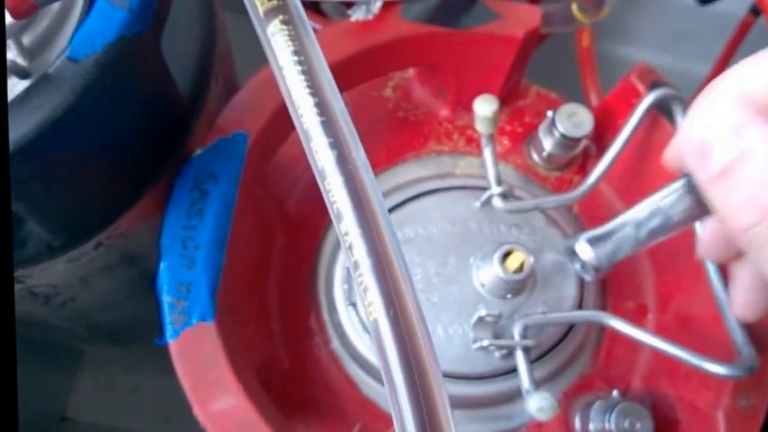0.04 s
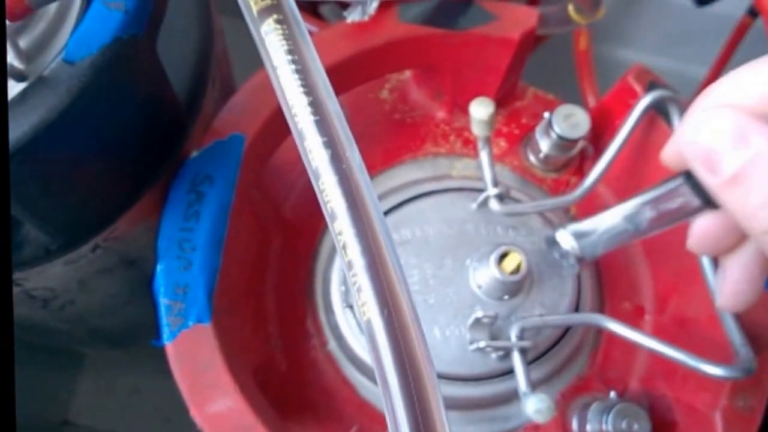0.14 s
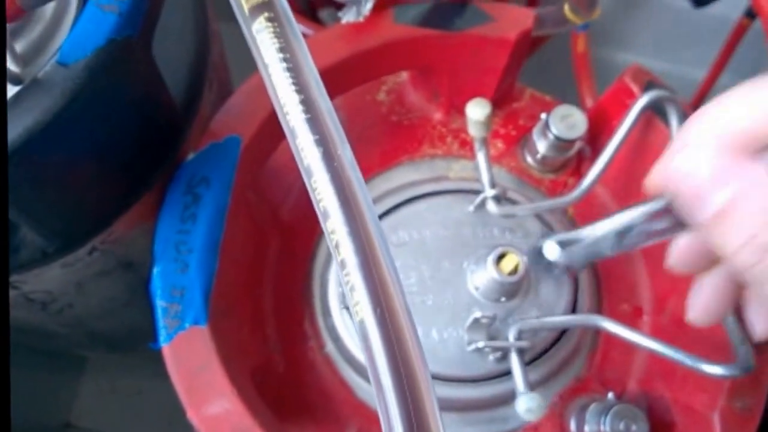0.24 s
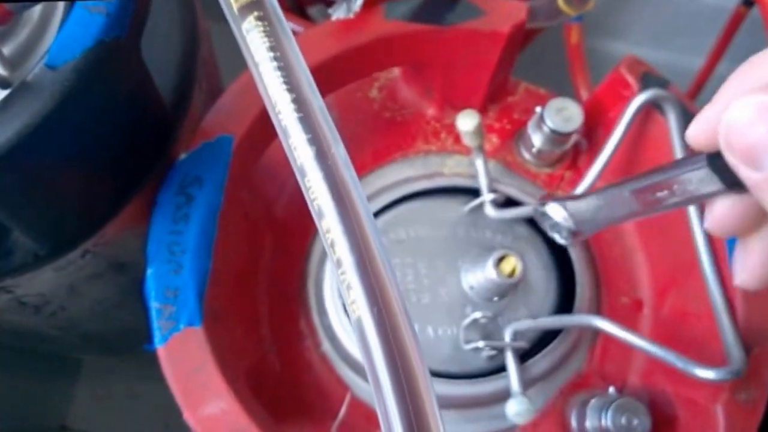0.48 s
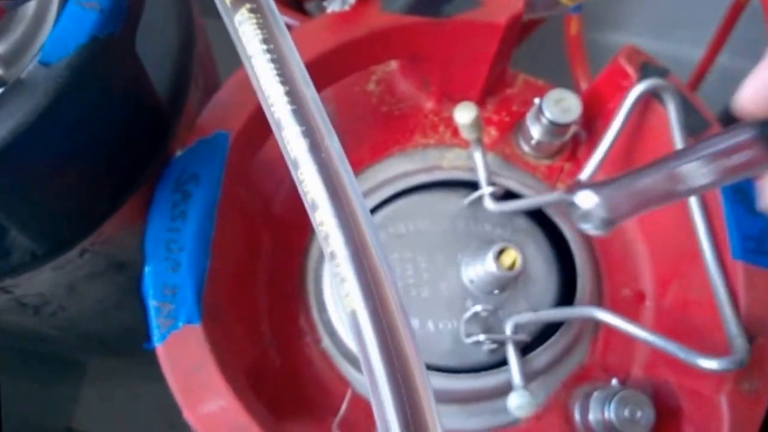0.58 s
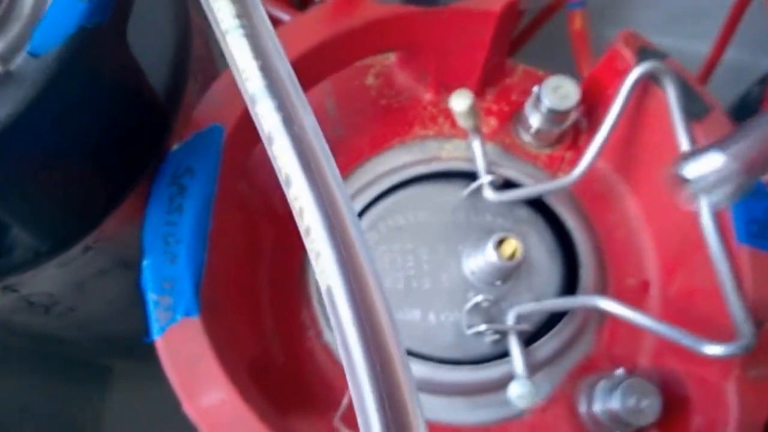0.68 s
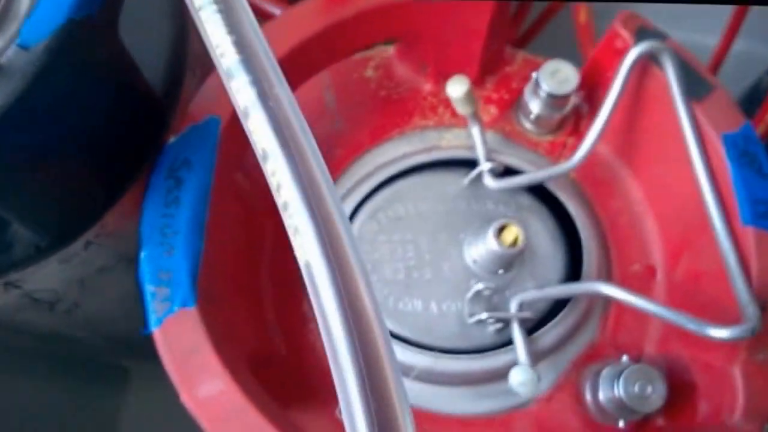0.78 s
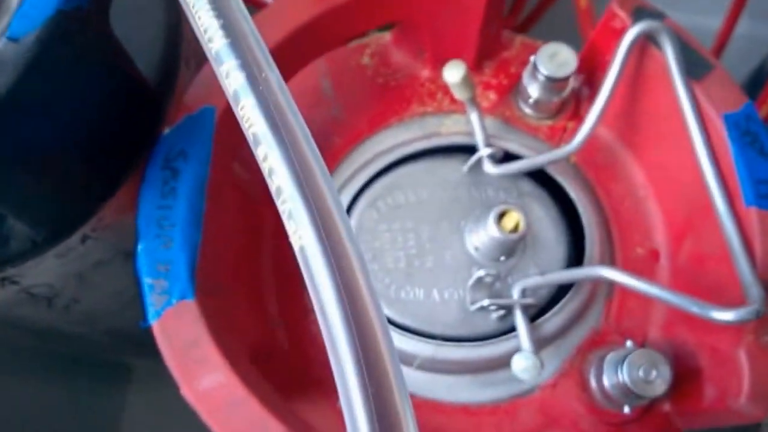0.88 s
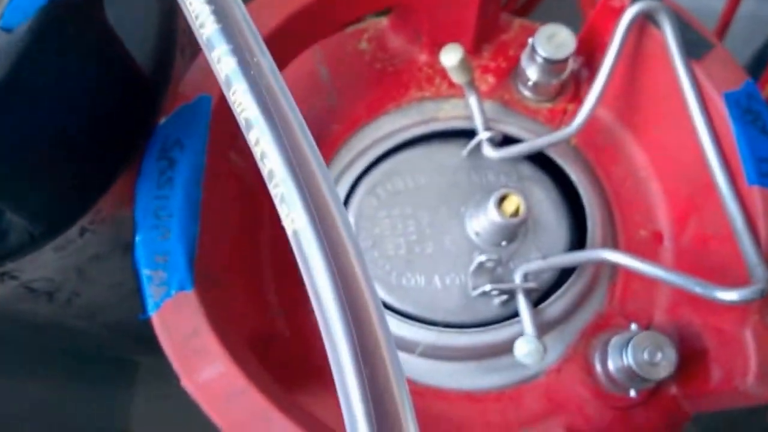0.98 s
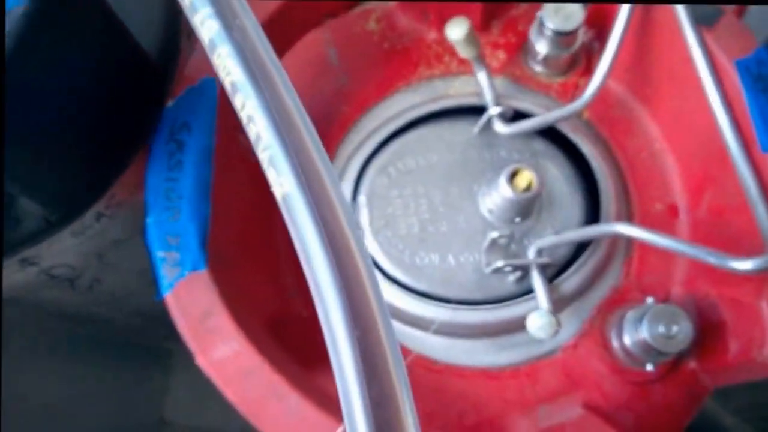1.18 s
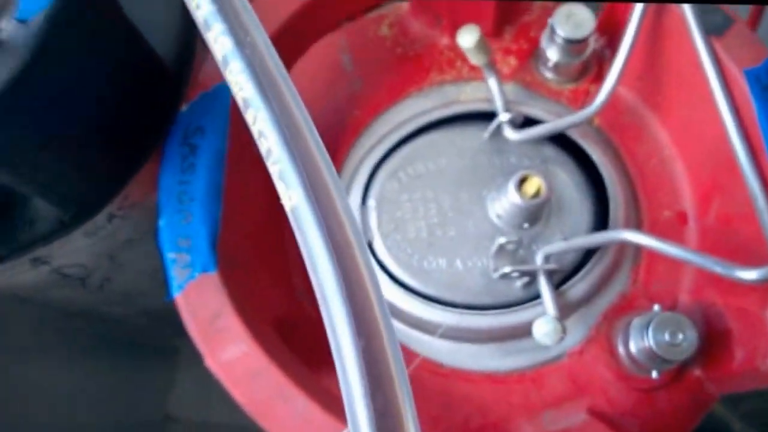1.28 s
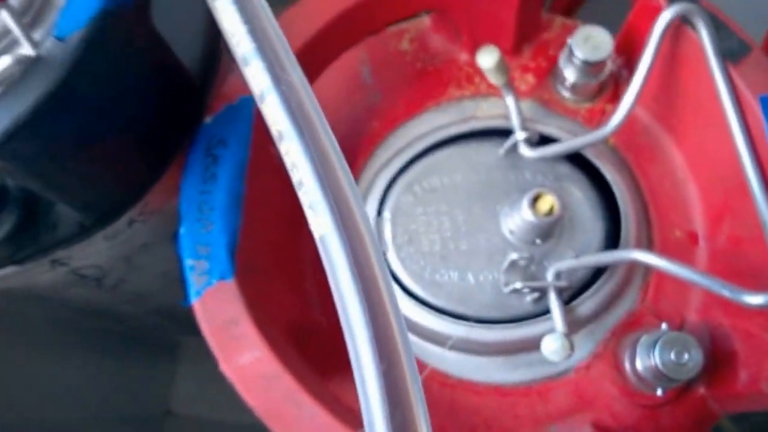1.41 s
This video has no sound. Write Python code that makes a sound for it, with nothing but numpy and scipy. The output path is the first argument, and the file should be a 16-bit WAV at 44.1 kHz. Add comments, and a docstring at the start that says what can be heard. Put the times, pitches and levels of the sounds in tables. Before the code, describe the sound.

Close to the microphone in a quiet room, two quick metal knocks hit a keg lid. The wire handle chatters, the lid scrapes loose with a pop and low boom, then rings briefly over a faint hum.

```python
"""A steel tool knocks twice on the lid of a steel keg, close to one microphone in a quiet room.
Each blow cracks and rings the shell; tool, wire handle and lid chatter after it, and the keg rocks.
The second blow frees the lid: it scrapes off its seal and rattles in the opening, the seal pops,
the air in the keg booms, and the loose lid rings on over the room's low hum."""
import sys
import numpy as np
from scipy import signal
from scipy.fft import rfft, irfft
from scipy.io import wavfile
from scipy.ndimage import uniform_filter1d

SR = 44100
rng = np.random.default_rng(int(sys.argv[2]) if len(sys.argv) > 2 else 0)


def transcribe(signal):
    """Save signal, clipped to [-1, 1], as a 16-bit WAV file at the path in sys.argv[1]."""
    frames = np.atleast_2d(signal).T
    limited = np.clip(frames, -1, 1)
    pcm = np.round(limited * 32767).astype(np.int16)
    wavfile.write(sys.argv[1], SR, pcm)


N = 63945
T = np.arange(N) / SR


def amp(db):
    """Decibels to gain."""
    return 10 ** (np.asarray(db) / 20)


def unit_rms(x):
    """Scales to rms 1."""
    return x / np.sqrt(np.mean(x ** 2) + 1e-20)


def read(points, hz):
    """Reads a table on a log-frequency axis."""
    f, value = np.transpose(points)
    return np.interp(np.log(hz + 1), np.log(f + 1), value)


def at(s, sound):
    """Starts a sound at s seconds."""
    return np.concatenate([np.zeros(round(s * SR)), sound])[:N]


def coloured(x, colour, tilt_db=0):
    """Gives x a spectrum, tilted per octave, at rms 1: a colour's levels are relative."""
    hz = np.fft.rfftfreq(N, 1 / SR)
    gain = amp(read(colour, hz) + tilt_db * np.log2(hz + 1))
    return unit_rms(irfft(rfft(x) * gain, N))


def noise(colour, tilt_db=0):
    """Steady coloured noise."""
    return coloured(rng.standard_normal(N), colour, tilt_db)


def fade(t, t60):
    """Falls 60 dB in t60 seconds."""
    return 10 ** (-3 * t / t60)


def dying(x, t60s):
    """Lets each band die at its own speed."""
    hz, t, bands = signal.stft(x, SR, nperseg=256)
    bands = bands * fade(t, read(t60s, hz)[:, None])
    return signal.istft(bands, SR, nperseg=256)[1][:N]


def ring(modes, rise_s):
    """Decaying sines of a struck object."""
    waves = (amp(db) * fade(T, t60) * np.sin(2 * np.pi * hz * T) for hz, db, t60 in modes)
    return np.minimum(T / rise_s, 1) * sum(waves)


def wander(width_hz):
    """A smooth random complex signal of rms 1."""
    white = rng.standard_normal((N, 2)) @ [1, 1j]
    lowpass = np.exp(-(np.fft.fftfreq(N, 1 / SR) / width_hz) ** 2)
    smooth = np.fft.ifft(np.fft.fft(white) * lowpass)
    return smooth / np.sqrt(np.mean(abs(smooth) ** 2))


def shaken(modes, share, rise_s=1 / SR):
    """Modes whose strength and phase are shaken by chattering contact."""
    out = np.zeros(N)
    for hz, db, t60 in modes:
        shake = np.sqrt(1 - share ** 2) + share * wander(width_hz=45.8)
        out += amp(db) * fade(T, t60) * (np.exp(2j * np.pi * hz * T) * shake).imag
    return np.minimum(T / rise_s, 1) * out


# The still room around the microphone (frequency [Hz], level [dB])
ROOM_TONE_COLOUR = [(20, -18.5), (40, -14.5), (58, 1.5), (80, -9), (125, -14), (230, -14.5), (340, -24),
                    (680, -28), (870, -13.5), (1100, -26.5), (2000, -35), (5500, -44.5), (9000, -54.5),
                    (16000, -51.5)]
def room_tone(hum_hz=58):
    """Faint steady noise and a low hum."""
    return amp(-57) * noise(ROOM_TONE_COLOUR) + amp(-56) * np.sin(2 * np.pi * hum_hz * T)


# Handling, barely heard even close up (frequency [Hz], level [dB])
RUB_COLOUR = [(25, -7.5), (100, 3.5), (300, -9.5), (600, -14), (1100, -7), (1500, -12), (2500, -23.5),
              (6000, -36), (16000, -46)]
def handling(hold_s=.2):
    """A dull rub while the tool is brought down."""
    return amp(-60.5) * noise(RUB_COLOUR) * fade(np.maximum(T - hold_s, 0), t60=.3)


# Thuds down at the floor (time [s], level [dB])
THUDS = [(0.142, -41.5), (0.236, -27.5), (0.294, -33)]
def keg_rocking(hz=62.5, t60=.24):
    """The keg rocks on the floor around the first blow."""
    thud = ring([(hz, 0, t60)], rise_s=.011)
    return sum(at(s, amp(db) * thud) for s, db in THUDS)


# Blows on the lid, close up (time [s], clang level [dB], crack level [dB], shell level [dB])
KNOCKS = [(0.2167, -20, -9.5, -44.5), (0.4033, -20, -11, -21.5)]
# Spectra of the crack and of the clang behind it (frequency [Hz], level [dB])
CRACK_COLOUR = [(40, -22.5), (200, -9), (600, -3), (1500, 3.5), (2800, -2.5), (4500, -1), (6200, -15.5),
                (9000, -24), (16000, -29.5)]
CLANG_COLOUR = [(25, -32.5), (120, -16), (280, -12.5), (380, -14), (600, -12), (1250, 0.5), (1750, -2),
                (2300, -0.5), (4300, -3.5), (5800, -16.5), (10000, -27.5), (16000, -35)]
# Die-away of the clang (frequency [Hz], t60 [s])
CLANG_T60 = [(100, 0.41), (700, .38), (1800, 0.4707), (4000, .36), (7000, .22), (15000, .1)]
CRACK_DECAY_S = .0027
def knocks():
    """Steel strikes steel: each blow is a sharp crack and a dense clang."""
    out = np.zeros(N)
    for s, clang_db, crack_db, _ in KNOCKS:
        crack = noise(CRACK_COLOUR) * np.exp(-T / CRACK_DECAY_S)
        clang = dying(noise(CLANG_COLOUR), CLANG_T60)
        out += at(s, amp(crack_db) * crack + amp(clang_db) * clang)
    return out


def keg_resonances(x, ripple_db=3, width_hz=40):
    """The keg's many crowded resonances ripple the spectrum of x."""
    bumps = unit_rms(uniform_filter1d(rng.standard_normal(N // 2 + 1), round(width_hz * N / SR)))
    cepstrum = irfft(np.log(amp(ripple_db * np.clip(bumps, -2, 2))), N)
    gain = np.exp(rfft(2 * cepstrum * (np.arange(N) < N // 2)))  # causal: no ring ahead of a blow
    response = irfft(gain / np.sqrt(np.mean(abs(gain) ** 2)), N)[:N // 20]
    return signal.fftconvolve(x, response)[:N]


# Modes of the keg's wall (frequency [Hz], level [dB], t60 [s])
SHELL_MODES = [(696.5, -20.5, 1), (913, 0.5, 0.25), (933.8, -6.5, .3), (1252, -13, .25), (1890, 3, .28),
               (2581, -8.5, 0.39), (2627, -4, 0.37), (4279, -9, .2), (4280, -7, 0.33)]
def shell_ring():
    """The blows ring the keg's shell, the second far more strongly."""
    shell = shaken(SHELL_MODES, share=.45, rise_s=.01223)
    return sum(at(s, amp(db) * shell) for s, *_, db in KNOCKS)


# Die-away of the room (frequency [Hz], t60 [s])
ROOM_T60 = [(100, .4), (1000, 0.59), (3000, 0.4176), (7000, 0.2), (11000, 0.16), (15000, .12)]
def room_tail(x, delay_s=.006):
    """A short diffuse tail reaches the microphone just after the direct sound, well below it."""
    tail = at(delay_s, dying(rng.standard_normal(N), ROOM_T60))
    return amp(-14.5) * signal.fftconvolve(x, tail / np.linalg.norm(tail))[:N]


# Chatter at the top of the keg (time [s], level [dB], treble tilt [dB/octave], tool level [dB])
CLINKS = [(0.2302, -31, 5.5, -30), (0.2338, -23.5, -2, -46), (0.2386, -26.5, 0.5, -46.5),
          (0.2459, -29, -3, -35), (0.273, -33, -5, -61.5), (0.4150, -36.5, 0.5, -53.5),
          (0.421, -23, 4.5, -24.5), (0.4385, -17, 4, -43.5), (0.4490, -16, 5, -34),
          (0.4530, -25.5, 0.5, -42.5), (0.4754, -20.5, 2, -28.5), (0.4924, -26, -5, -47),
          (0.5084, -32.5, -7, -53)]
# Spectrum of a clink (frequency [Hz], level [dB])
CLINK_COLOUR = [(25, -37), (150, -21.5), (350, -24.5), (700, -22), (1500, -7.5), (2600, 0.5), (4400, 1.5),
                (6000, -8), (10300, -11.5), (12300, -17), (15000, -20)]
# Die-away of a clink (frequency [Hz], t60 [s])
CLINK_T60 = [(300, 0.09), (2500, .19), (7000, .13), (15000, .1)]
def clinks():
    """Tool, wire handle and lid touch in light, hard, bright contacts."""
    snap = 1 + amp(-.5) * np.exp(-T / CRACK_DECAY_S)
    out = np.zeros(N)
    for s, db, tilt_db, _ in CLINKS:
        clink = dying(noise(CLINK_COLOUR, tilt_db), CLINK_T60)
        out += at(s, amp(db) * snap * clink)
    return out


# Modes of the steel tool (frequency [Hz], level [dB], t60 [s])
TOOL_MODES = [(2088, 0, 0.2), (2187.6, -11, 0.21), (2511, -2, .27), (2823.5, -3.5, 0.2718), (3550, -4, .2),
              (5098, -9.5, .11), (6970, -9, 0.0999), (7241, -4, 0.19), (8000, -4, .12), (8545, 3.5, 0.073),
              (9931, -1.5, .09), (11400, -11, .08), (14243, -6.5, 0.07027), (14490, -3, .07)]
def tool_ring():
    """Each light contact rings the tool."""
    tool = shaken(TOOL_MODES, share=.59)
    return sum(at(s, amp(db) * tool) for s, *_, db in CLINKS)


# The scrape at the rim, bright at close range (frequency [Hz], level [dB])
SCRAPE_COLOUR = [(25, -30), (130, -10.5), (330, -15), (900, -2.5), (1500, -10.5), (2700, -5), (4300, -3),
                 (6200, -7.5), (10300, -7.5), (12300, -14.5), (15200, -11.5)]
def lid_scrape(slips_per_s=7000, spread_db=2, rise_s=.004, hold_s=.0453):
    """A burst of tiny slips as the lid slides off its seat."""
    sizes = rng.standard_normal(N) * amp(spread_db * rng.standard_normal(N))
    slips = sizes * (rng.random(N) < slips_per_s / SR)
    envelope = np.minimum(T / rise_s, 1) * fade(np.maximum(T - hold_s, 0), t60=.11)
    return at(.436, amp(-22.5) * envelope * coloured(slips, SCRAPE_COLOUR))


# The dull pop at the keg's mouth (frequency [Hz], level [dB])
POP_COLOUR = [(25, -25.5), (70, -5.5), (200, -2), (320, -5.5), (600, -3), (1100, -1), (2500, -25.5),
              (8000, -50.5)]
def seal_pop(boom_hz=124.35, boom_db=-25.5, boom_t60=.46):
    """The seal pops open and the air inside the keg booms."""
    pop = amp(-22) * noise(POP_COLOUR) * fade(T, t60=.07)
    boom = ring([(boom_hz, boom_db, boom_t60)], rise_s=.028)
    return at(.437, pop + boom)


# Modes of the lid, loose in the opening (frequency [Hz], level [dB], t60 [s])
LID_MODES = [(1593.6, -24, 0.64), (1979, -28.5, 0.45), (2210.1, -49.5, .8), (2571, -33, 0.57),
             (2812, -34.5, 0.45), (3063.7, -10.5, .22), (3617, -26.5, 0.31), (3947, -41, .36),
             (7063, -36, .12), (13561, -33.5, 0.11)]
def lid_ring(note_hz=1376.6, note_db=-30, note_t60=3.2, late_s=.346, late_fade_db_per_s=58):
    """The freed lid rings; the recorder's noise suppressor fades its longest note faster once faint."""
    late_fade = amp(-late_fade_db_per_s * np.maximum(T - late_s, 0))
    note = ring([(note_hz, note_db, note_t60)], rise_s=.007) * late_fade
    return at(.459, ring(LID_MODES, rise_s=.007) + note)


def scene():
    """All that reaches the microphone, in mono; only the clatter has a room tail."""
    clatter = keg_resonances(knocks() + clinks() + lid_scrape()) + shell_ring() + tool_ring()
    keg = clatter + room_tail(clatter) + lid_ring() + keg_rocking() + seal_pop()
    return (keg + handling() + room_tone())[None]


def record(dry):
    """The microphone chain overloads softly on the peaks, then cuts the highest treble."""
    ceiling, edge_hz = .55, 15900
    rounded = ceiling * np.tanh(dry / ceiling)
    lowpass = signal.firwin(255, edge_hz, window=("kaiser", 9), fs=SR)
    return signal.oaconvolve(rounded, lowpass[None], "same")


dry = scene()
out = record(dry)
transcribe(out)
```